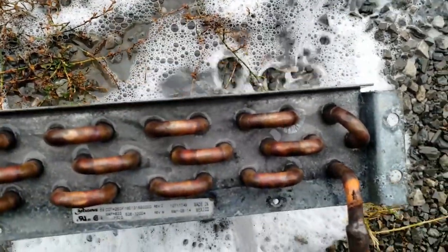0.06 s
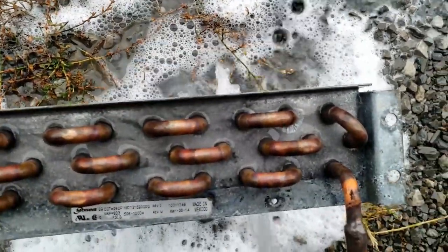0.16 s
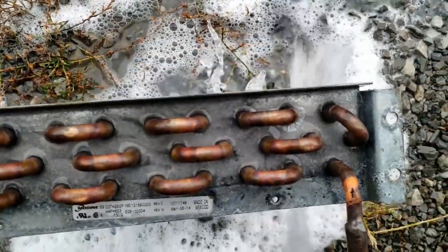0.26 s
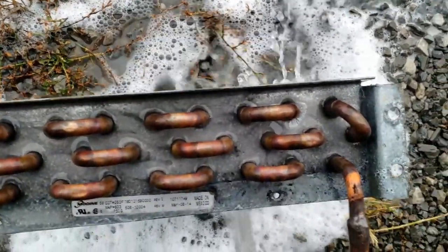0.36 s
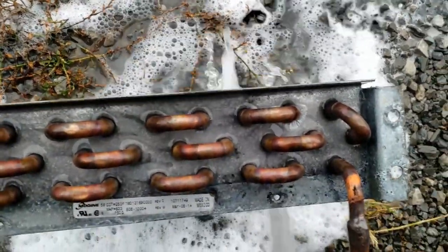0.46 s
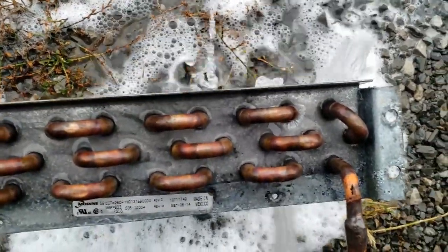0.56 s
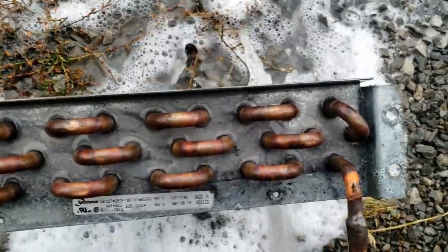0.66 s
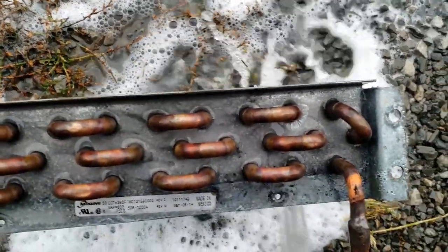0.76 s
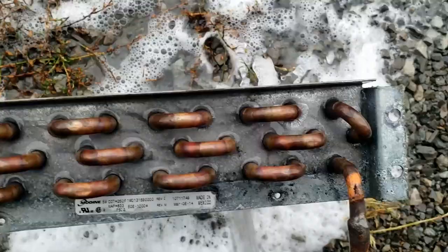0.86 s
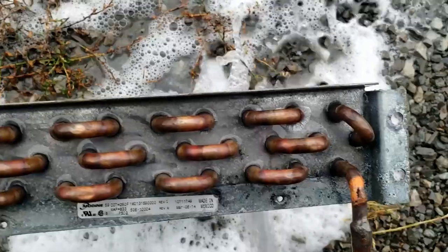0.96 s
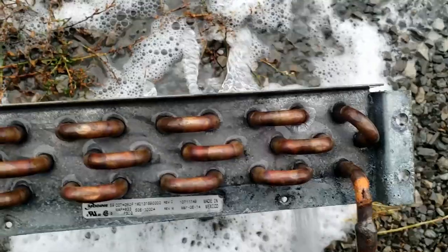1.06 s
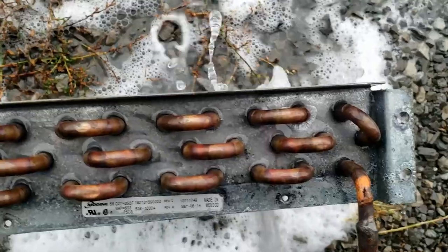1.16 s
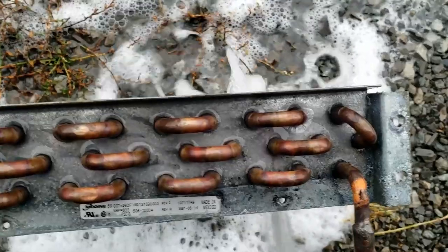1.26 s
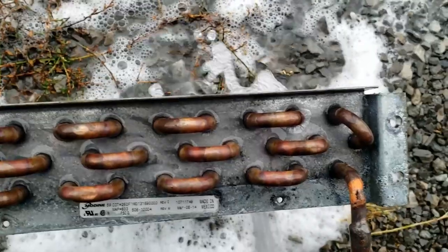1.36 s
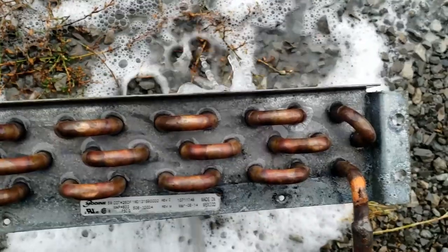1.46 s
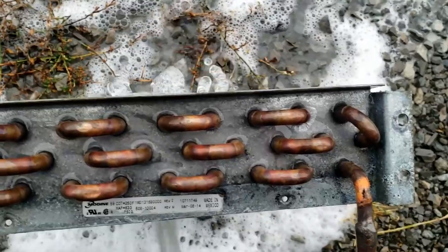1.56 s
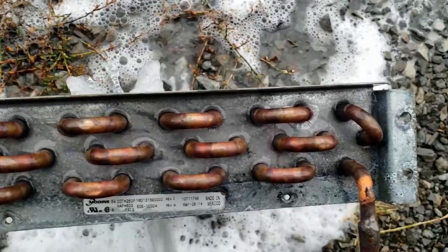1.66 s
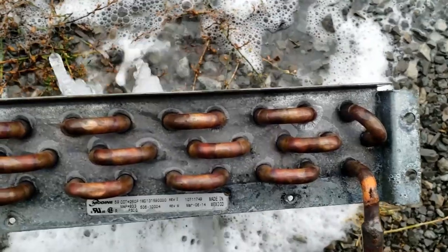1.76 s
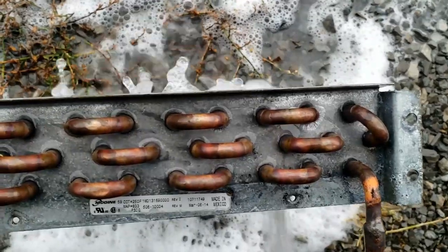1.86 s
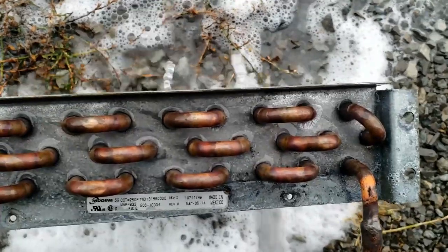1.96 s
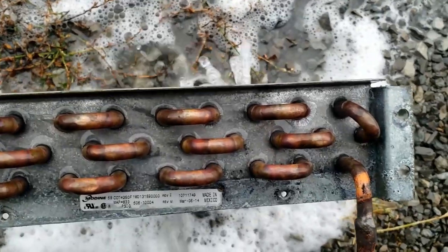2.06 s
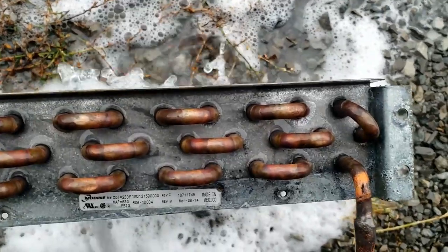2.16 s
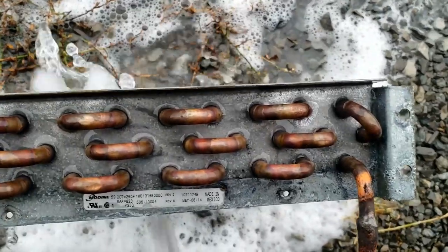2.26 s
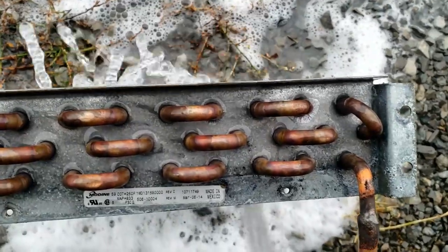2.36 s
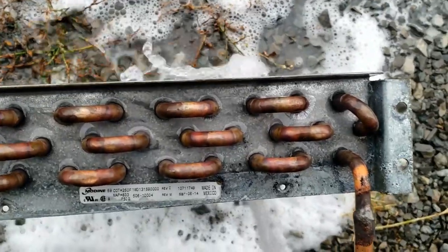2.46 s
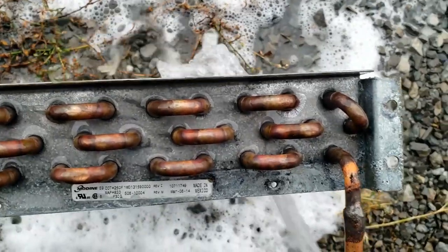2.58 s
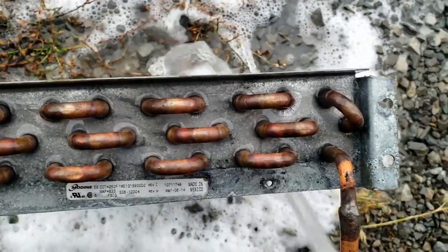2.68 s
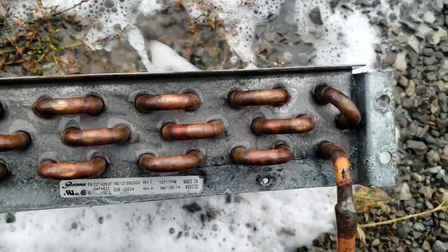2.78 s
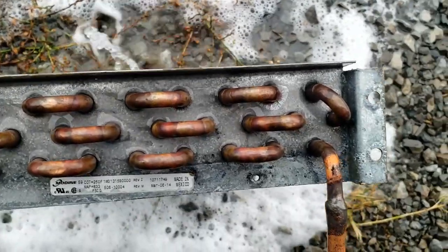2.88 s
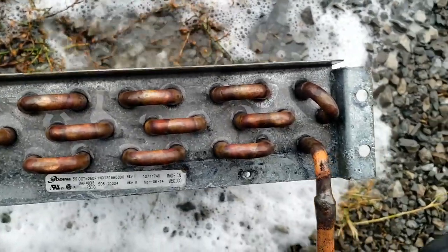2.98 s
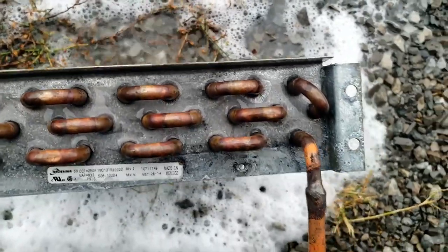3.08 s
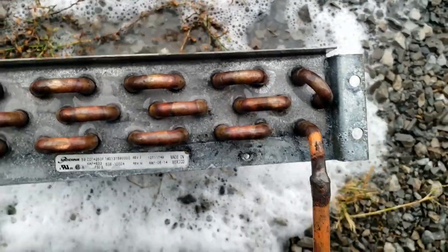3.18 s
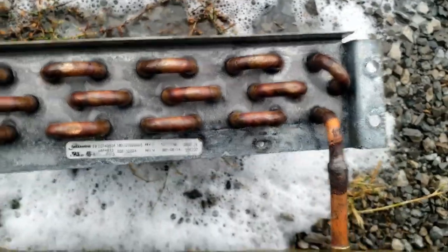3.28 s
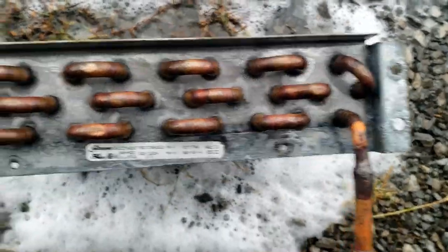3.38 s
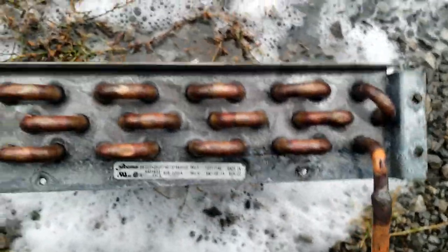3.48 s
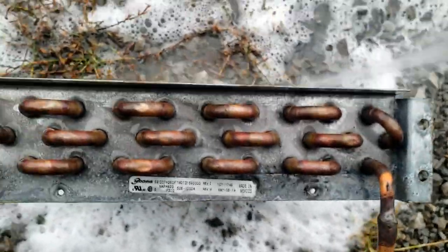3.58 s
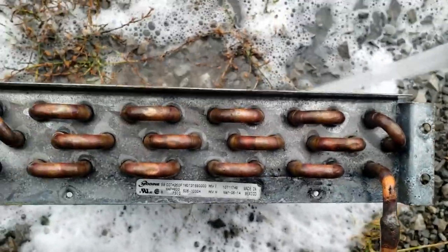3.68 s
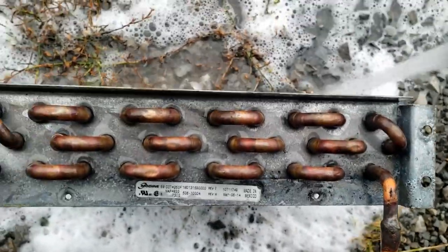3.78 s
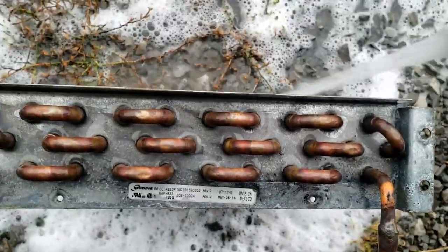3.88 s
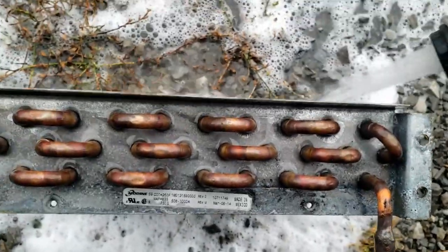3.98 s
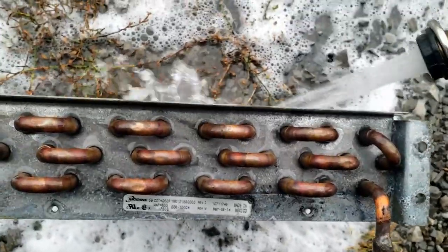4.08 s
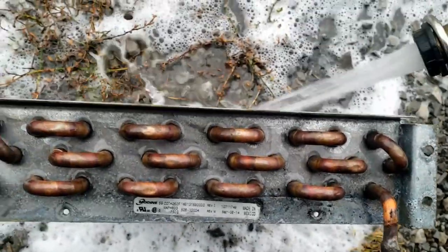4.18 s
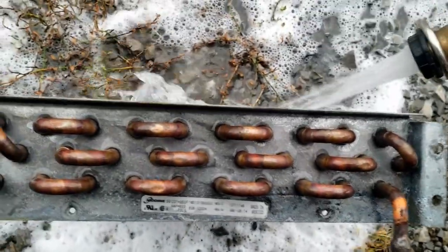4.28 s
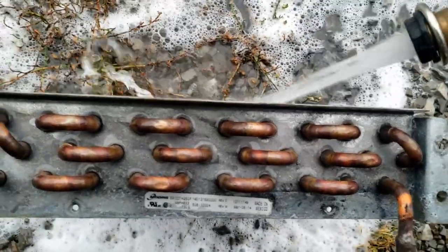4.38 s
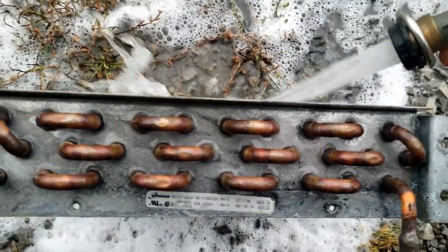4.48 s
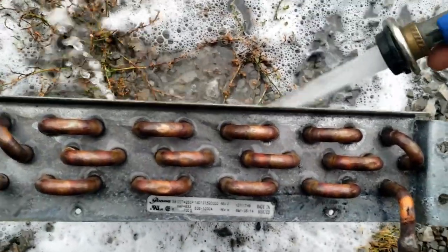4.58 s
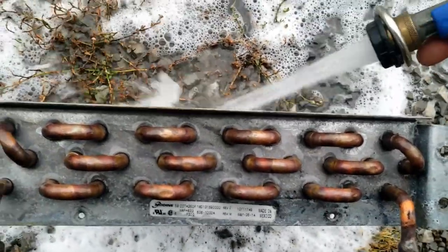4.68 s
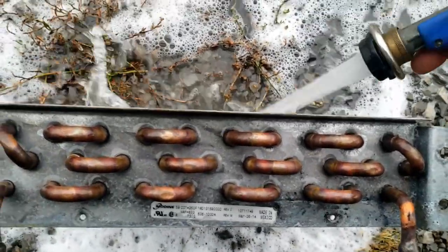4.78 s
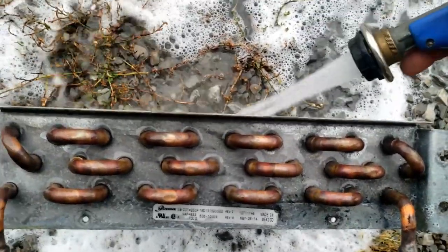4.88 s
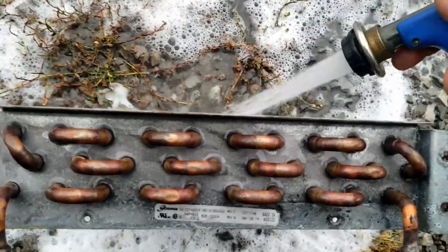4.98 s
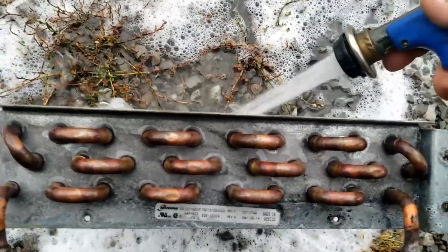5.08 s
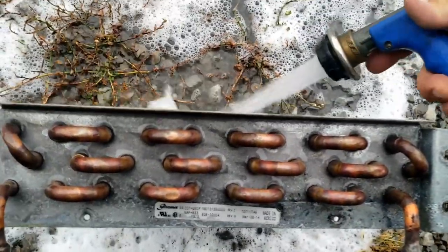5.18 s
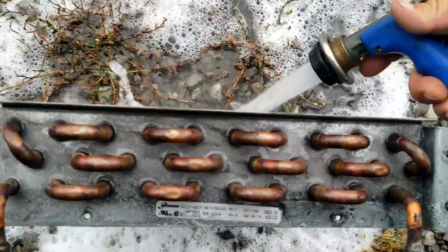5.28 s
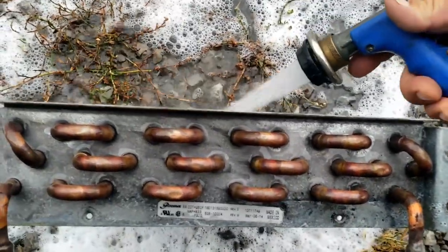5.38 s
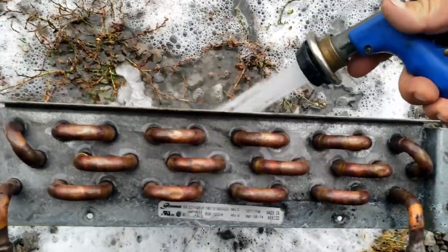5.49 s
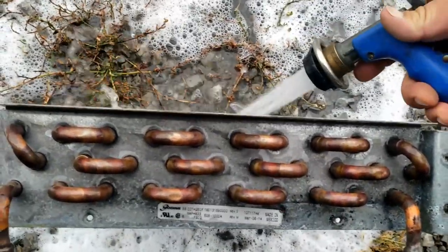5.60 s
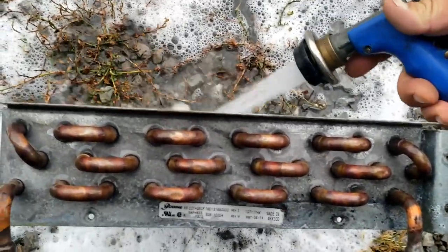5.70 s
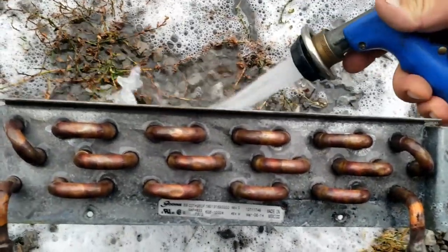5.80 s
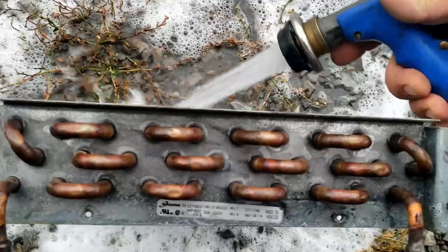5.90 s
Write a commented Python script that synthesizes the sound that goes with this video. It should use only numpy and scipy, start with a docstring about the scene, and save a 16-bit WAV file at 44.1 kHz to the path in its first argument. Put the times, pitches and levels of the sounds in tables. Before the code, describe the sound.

A garden hose jet hisses loudly on a finned metal coil, cuts off with a few watery splats, then bursts back and sprays on.

```python
"""Outdoors, close by and a little to the left of a two-port microphone, a garden hose sprays a finned metal coil.
Countless drops, each a tiny noise burst, hiss on the fins and make the gaps between them ring.
A short reflection inside the coil adds a row of peaks that phases as the jet sweeps.
The jet breaks off, a few slugs of water splat down, a soft spray creeps back, and the jet strikes again.
Stray drops tick near the microphone, soft bumps thud, and low outdoor rumble and a faint hum lie behind."""
import sys
import numpy as np
from scipy import signal
from scipy.fft import rfft, irfft
from scipy.io import wavfile
from scipy.ndimage import uniform_filter1d

SR = 44100
rng = np.random.default_rng(int(sys.argv[2]) if len(sys.argv) > 2 else 0)


def generate_wav(signal):
    """Clip the signal to [-1, 1] and save it as 16-bit WAV at the path in sys.argv[1]."""
    frames = np.transpose(np.atleast_2d(signal))
    scaled = np.clip(frames, -1, 1) * 32767
    pcm = np.round(scaled).astype(np.int16)
    wavfile.write(sys.argv[1], SR, pcm)


N = 261954
TIME = np.arange(N) / SR
HZ, FRAME_S, _ = signal.stft(TIME, SR, nperseg=512, noverlap=384)  # grid for all spectral shaping

# Colour of the first jet's water noise: pitch_hz, level_db (per Hz, relative)
FIRST_JET_COLOUR = [(120, -41), (200, -32), (538, -30), (709, -23), (1450, -15.5), (2130, -6), (3430, -9),
                    (4040, -2.5), (4950, -3), (6050, 0.5), (7410, -2.5), (9060, -21), (10300, -20.5),
                    (12800, -1.5), (16000, -16)]
# Resonances and hollows of the fin gaps under the first jet: pitch_hz, width_hz, lift_db
FIRST_JET_GAPS = [(714, 170, 5), (1700, 140, 0.5), (2173, 350, 4.5), (2530, 160, 1), (4180, 120, 1),
                  (4300, 140, -2), (4600, 130, 3.5), (6100, 400, 0.5), (13100, 1240, -4)]
# Lag of the reflection inside the coil, set by where the jet is aimed: time_s, lag_ms
FIRST_JET_ECHO = [(0, 1.35), (1.5, 1.43), (2.8, 1.22)]
# Force of the first jet on the coil, drifting as the hand moves: time_s, splash_db (before passes and surge)
FIRST_JET_FORCE = [(0, -30.5), (.12, -27), (.95, -25.5), (1.35, -27), (1.9, -28.5), (2.3, -28.5),
                   (2.68, -29.5)]
# Passes of the first jet squarely into the fins: middle_s, length_s, strength_0_to_1
SQUARE_PASSES = [(1.676, 0.42, 0.7), (2.21, .3, 1.0)]
# On a pass the fins hiss at RING_HZ in place of GAP_HZ; the gap rings most while the jet rests on it
RING_HZ, RING_WIDTH_HZ = 6210, 2700
GAP_HZ, GAP_WIDTH_HZ, GAP_AT_S, GAP_S = 4150, 1200, 0.98, 0.54
# The closing nozzle narrows the jet into a last surge, then cuts it off
SURGE_AT_S, SURGE_S, SHUT_AT_S, SHUT_S, MIST_LINGER_S = 2.758, 0.053, 2.7865, 0.019, .008


def first_jet(body_db=-7.5, mist_db=-1.34, gap_db=3, gap_swell_db=3, ring_db=10, hollow_db=5,
              pass_db=4.0, pass_body_db=-6.0, pass_mist_db=-1.5, closing_db=7.0, closing_body_db=3,
              closing_ring_db=6, closing_hz=3300, lean_db=0.7, lean_db_per_s=0.9):
    """A steady jet that rings the fins on each pass, surges as the nozzle closes, and stops."""
    square = sum(strength * hump(s, length) for s, length, strength in SQUARE_PASSES)
    closing = hump(SURGE_AT_S, SURGE_S)
    valve_db = in_db(1 - step(SHUT_AT_S, SHUT_S))
    late_mist_db = in_db(1 - step(SHUT_AT_S + MIST_LINGER_S, SHUT_S)) - valve_db

    splash_db = follow(FIRST_JET_FORCE, FRAME_S)[0] + pass_db * square + closing_db * closing + valve_db
    body_db = body_db + pass_body_db * square + closing_body_db * closing
    mist_db = mist_db + pass_mist_db * square + late_mist_db

    gap_lift_db = gap_db * (1 - square) + gap_swell_db * hump(GAP_AT_S, GAP_S)
    pass_tone_db = ring_db * bell(RING_HZ, RING_WIDTH_HZ) + hollow_db * bell(600, 590)
    aim_db = gap_lift_db * bell(GAP_HZ, GAP_WIDTH_HZ) + square * pass_tone_db
    aim_db = aim_db + closing_ring_db * closing * bell(closing_hz, 1900)

    ripple = comb(follow(FIRST_JET_ECHO, FRAME_S)[0], strength=0.086)
    return spray((splash_db, body_db, mist_db), FIRST_JET_COLOUR, FIRST_JET_GAPS, aim_db, ripple,
                 lean_db=lean_db + lean_db_per_s * (FRAME_S - 1.5),
                 surge_db=0.62, flutter_db=0.83, spread_db=1.5)


# Colour of the second jet's water noise: pitch_hz, level_db (per Hz, relative)
SECOND_JET_COLOUR = [(120, -44), (200, -27), (548, -31), (899, -22.5), (2090, -9.5), (2470, -12),
                     (3020, -12.5), (3830, -8), (4270, -5), (5040, -4), (7270, -1.5), (9580, -14.5),
                     (11900, 0.5), (13300, 5), (16000, -5)]
# Resonances of the fin gaps under the second jet: pitch_hz, width_hz, lift_db
SECOND_JET_GAPS = [(300, 370, 2), (1860, 130, 3), (2130, 310, 2.5), (2500, 250, 0), (2730, 140, 5),
                   (4100, 250, 2)]
# Lag of its reflection inside the coil, before the waggle: time_s, lag_ms
SECOND_JET_ECHO = [(3.6, 1.39), (3.85, 1.34), (4.05, 1.39), (4.35, 1.365), (4.85, 1.37), (5.15, 1.18),
                   (5.65, 1.185), (5.94, 1.27)]
SECOND_ECHO_SHARE, SECOND_ECHO_GROWTH_PER_S = .34, .07
# Force of the second jet on the coil: time_s, splash_db (before the opening burst)
SECOND_JET_FORCE = [(3.6, -31), (4.15, -32.5), (4.4, -30.5), (5.05, -32), (5.94, -31.5)]
# On reopening the mist arrives first, and the pressure stored in the hose dies away
OPEN_AT_S, OPEN_S, MIST_LEAD_S, SETTLE_S = 3.597, 0.016, 0.019, 0.18
# The hand then waggles the jet to and fro, slowing down
WAGGLE_CREST_S, WAGGLE_PER_S, WAGGLE_SLOWING_PER_S2 = 4.025, 4.65, .75
WAGGLE_FROM_S, WAGGLE_MS, WAGGLE_BEND_HZ = 4.1, .06, 130


def second_jet(body_db=-10, mist_db=2.6, mist_db_per_s=-0.8, burst_db=10.5, burst_body_db=-4,
               gap_db=4.5, gap_from_s=3.96, gap_hz=4360, gap_width_hz=550, waggle_gap_db=1.5,
               burst_ring_db=6, burst_ring_hz=3700, burst_glide_hz=3800, burst_glide_s=0.05,
               skim_db=-7, skim_hz=3800, skim_s=0.017):
    """The jet bursts out with a falling ring, settles, and phases as the hand waggles it across the fins."""
    age = np.maximum(FRAME_S - OPEN_AT_S, 0)
    burst = np.exp(-age / SETTLE_S)
    valve_db = in_db(step(OPEN_AT_S, OPEN_S))
    early_mist_db = in_db(step(OPEN_AT_S - MIST_LEAD_S, OPEN_S)) - valve_db

    splash_db = follow(SECOND_JET_FORCE, FRAME_S)[0] + burst_db * burst + valve_db
    body_db = body_db + burst_body_db * burst
    mist_db = mist_db + mist_db_per_s * (age - 1) + early_mist_db

    t = FRAME_S - WAGGLE_CREST_S
    waggle_turns = WAGGLE_PER_S * t - WAGGLE_SLOWING_PER_S2 * t ** 2 / 2
    waggle = step(WAGGLE_FROM_S, 0.086) * np.cos(2 * np.pi * waggle_turns)
    lag_ms = follow(SECOND_JET_ECHO, FRAME_S)[0] + WAGGLE_MS * waggle

    # the struck gap bends with the waggle, and rings hardest when a peak of the reflection sweeps through it
    in_tune = np.cos(2 * np.pi * gap_hz * lag_ms / 1000)
    gap_lift_db = (gap_db + waggle_gap_db * in_tune) * step(gap_from_s, 0.073)
    falling_hz = burst_ring_hz + burst_glide_hz * np.exp(-age / burst_glide_s)
    aim_db = gap_lift_db * bell(gap_hz - WAGGLE_BEND_HZ * waggle, gap_width_hz)
    aim_db = aim_db + burst_ring_db * burst * bell(falling_hz, 1700)
    # at first the jet only skims the fins
    aim_db = aim_db + skim_db * np.exp(-age / skim_s) * bell(skim_hz, 2200)

    ripple = comb(lag_ms, strength=SECOND_ECHO_SHARE + SECOND_ECHO_GROWTH_PER_S * age)
    return spray((splash_db, body_db, mist_db), SECOND_JET_COLOUR, SECOND_JET_GAPS, aim_db, ripple,
                 lean_db=0.5, surge_db=0.47, flutter_db=0.48, spread_db=1.5)


# Colour of the weak flows: pitch_hz, level_db (per Hz, relative)
WEAK_COLOUR = [(180, -69), (300, -27), (678, -22.5), (842, -14), (1010, -12.5), (1530, -8), (2000, -9.5),
               (2400, -8.5), (2740, -11.5), (3290, -12.5), (3580, -15), (6410, -13.5), (10200, -21),
               (13100, -11.5), (16000, -14)]
# Resonances and hollows of the fin gaps under them: pitch_hz, width_hz, lift_db
WEAK_GAPS = [(850, 300, 2.5), (2360, 230, 5.5), (2820, 300, 2.5), (3300, 250, 3), (4370, 700, -3),
             (6400, 650, 2.5)]
# Draining, trickle and soft spray in the pause:
# start_s, stop_s, splash_db, growth_db_per_s, body_db (re splash), mist_db (re splash)
PAUSE_FLOWS = [(2.795, 3.02, -54, -5, -8, 0), (3.0, 3.217, -64.5, -16, -2, 4.5),
               (3.2, 3.325, -66.5, 120, 0, 5), (3.322, 3.55, -46.5, -25, -2.5, 1)]
WEAK_EDGE_S = 0.0045


def weak_flows():
    """Between the jets a little water still runs over the fins."""
    power = np.zeros((3, len(FRAME_S)))
    for start, stop, db, growth, body_db, mist_db in PAUSE_FLOWS:
        gate = step(start, WEAK_EDGE_S) * (1 - step(stop, WEAK_EDGE_S))
        level = gate * gain_of(db + growth * np.clip(FRAME_S - start, 0, stop - start))
        power += (level * gain_of([[0], [body_db], [mist_db]])) ** 2
    splash, body, mist = in_db(np.sqrt(power))
    return spray((splash, body - splash, mist - splash), WEAK_COLOUR, WEAK_GAPS,
                 lean_db=.5, surge_db=0.4, flutter_db=1.3, spread_db=4.0)


def spray(flow, colour, gaps, aim_db=0, ripple=1, lean_db=0, surge_db=1, flutter_db=1, spread_db=3,
          gurgle_db=1.34, patchy_db=1.46):
    """Drops drive the fin body, the splash and the mist, all surging with the broken jet."""
    splash_db, body_db, mist_db = flow  # body and mist are relative to the splash
    shape_db = read(colour) + sum(lift * bell(hz, width) for hz, width, lift in gaps) + aim_db
    # water films open and close: blotches of colour, deepest in the low gurgle
    film_db = (patchy_db + gurgle_db * bell(420, 1400)) * patches(count_bins=4, count_frames=18)
    shape = gain_of(shape_db + film_db)

    # split into body below 3350 Hz, splash up to 9300 Hz and mist above; each is levelled in its own band
    below_3350, below_9300 = (1 / (1 + (HZ[:, None] / hz) ** 12) for hz in (3350, 9300))
    above_body, above_splash = (1 / (1 + (hz / (HZ[:, None] + 1)) ** 12) for hz in (3350, 9300))
    body = (1 - above_body) * gain_of(body_db) / band_level(shape, 600, 3200)
    splash = (above_body - above_splash) / band_level(shape, 3500, 8000)
    mist = above_splash * gain_of(mist_db) / band_level(shape, 11000, 16000)

    # clusters of drops flicker across wide bands
    level = gain_of(splash_db + flutter_db * patches(count_bins=45, count_frames=3))
    drops = patter(per_s=3400, spread_db=spread_db, splash_s=0.0006, wash=1.0)
    drops = evened(drops * gain_of(surge_db * wander(7, 110, 0.49)))
    return at_ports(drops, ripple * shape * level * (body + splash + mist), lean_db)


def comb(left_lag_ms, strength, right_lag_ms=0.11, centre_hz=4000, span_hz=7000):
    """Sound bouncing inside the coil: a row of peaks that sweeps as the lag changes, fading from centre_hz."""
    lag_ms = left_lag_ms + np.array([0, right_lag_ms])[:, None, None]  # right port hears a longer lag
    share = np.clip(strength, 0, .8) * bell(centre_hz, span_hz)
    phase = 2 * np.pi * HZ[:, None] * lag_ms / 1000
    return np.sqrt((1 - share ** 2) / (1 + share ** 2 - 2 * share * np.cos(phase)))


def patter(per_s, spread_db, splash_s, wash):
    """Each drop is a tiny burst of noise; most are small and melt into a wash."""
    lands = rng.random(N) < per_s / SR
    size = gain_of(spread_db * np.minimum(rng.exponential(1, N), 5)) * lands
    power = signal.lfilter([1], [1, -np.exp(-1 / (splash_s * SR))], size ** 2)
    return evened(np.sqrt(power / power.mean() + wash) * rng.standard_normal((2, N)))


# Colour of the slaps: pitch_hz, level_db (per Hz, relative)
SLAP_COLOUR = [(240, -59), (400, -23), (460, -51), (520, -40), (789, -53), (1760, -18.5), (3310, -19),
               (5690, 0.5), (10100, -13.5), (12900, -12), (16000, -10)]
# Large slugs of water landing: start_s, level_db (before level_db below), decay_s, brightness_db_per_octave
SLUGS = [(2.874, -36.5, 0.0036, 10), (2.894, -36, 0.0074, 3), (2.958, -30.5, .008, 1),
         (2.97, -27, .0027, 0), (2.9745, -25, .0028, 1), (3.213, -43, 0.0099, -7.5)]
# Smaller slugs dribble down among them
DRIBBLE_FROM_S, DRIBBLE_TO_S, DRIBBLE_DECAY_S = 2.9, 3.01, 0.0076
DRIBBLE_DB, DRIBBLE_SPREAD_DB = -37.5, 2.5


def splats(level_db=1.0, lean_db=5.0, rise_s=.0004, count=8):
    """Slugs of water slap down, each a short crackling burst."""
    dribble = []
    for slot in (np.arange(count) + rng.random(count)) / count:
        at_s = DRIBBLE_FROM_S + slot * (DRIBBLE_TO_S - DRIBBLE_FROM_S)
        dribble.append((at_s, DRIBBLE_DB + DRIBBLE_SPREAD_DB * rng.standard_normal(), DRIBBLE_DECAY_S))

    power, age = np.zeros(N), TIME[:SR // 10]
    for s, db, decay, *_ in list(SLUGS) + dribble:
        slap = gain_of(db) * (1 - np.exp(-age / rise_s)) * np.exp(-age / decay)
        power[round(s * SR):][:len(age)] += slap ** 2

    # brightness glides from slug to slug
    tilt_db = follow(SLUGS, FRAME_S)[2] * np.log2((HZ[:, None] + 500) / 6000)
    shape = evened(gain_of(read(SLAP_COLOUR))) * gain_of(tilt_db)
    crackle = patter(per_s=1700, spread_db=4.5, splash_s=0.0002, wash=0.82)
    return at_ports(np.sqrt(power) * crackle, gain_of(level_db) * shape, lean_db)


# Stray drops ticking close by: start_s, level_db (before level_db below), pitch_hz
STRAY_DROPS = [(1.951, -17, 11900), (3.682, -20, 12500)]


def ticks(level_db=-4, width_hz=3500, decay_s=0.0017):
    """Single drops strike near the microphone, each a dying burst of noise around its pitch."""
    burst = 0
    for s, db, _ in STRAY_DROPS:
        burst = burst + gain_of(db) * (TIME > s) * np.exp(-np.minimum(abs(TIME - s) / decay_s, 20))
    colour = evened(bell(follow(STRAY_DROPS, FRAME_S)[1], width_hz))
    return at_ports(burst * rng.standard_normal((2, N)), gain_of(level_db) * colour, 0)


# Soft handling bumps at the microphone: start_s, level_db (before level_db below)
HANDLING_BUMPS = [(.31, -60), (.59, -51), (.685, -54), (3.03, -53)]


def bumps(hz=62, swell_s=0.0074, level_db=2):
    """Each bump is a few dying cycles of bass."""
    out, age = np.zeros(N), TIME[:SR // 5]
    thud = age / swell_s * np.exp(1 - age / swell_s) * np.sin(2 * np.pi * hz * age)
    for s, db in HANDLING_BUMPS:
        out[round(s * SR):][:len(age)] += gain_of(db + level_db) * thud
    return out


# Colour of the outdoor rumble: pitch_hz, level_db (per Hz, relative)
RUMBLE_COLOUR = [(12, -41), (20, -14), (70, 0.5), (113, -1), (146, -7), (250, -3.5), (320, -29),
                 (550, -120)]


def rumble(level_db=-68.5, apart=0.5, swell_db=0.5, corner_hz=260):
    """Low outdoor noise, partly shared by the ports, slowly swelling."""
    f, (hz, db) = np.fft.rfftfreq(N, 1 / SR), np.transpose(RUMBLE_COLOUR)
    colour_db = np.interp(np.log(f + 1), np.log(hz + 1), db)
    shape = gain_of(colour_db) / (1 + (f / corner_hz) ** 4)
    mid, side = evened(irfft(rfft(rng.standard_normal((2, N))) * shape, N))
    swell = gain_of(level_db + swell_db * wander(1, 8, .3))
    return np.array([mid + apart * side, mid - apart * side]) * swell


# Faint hum: mean pitch_hz, level_db (rms, before trim_db below)
FAINT_HUM = [(118.4, -77.5)]


def hum(trim_db=-1.0, waver_hz=3.3):
    """A faint sine tone whose pitch wavers."""
    hz, db = FAINT_HUM[0]
    turns = np.cumsum(hz + waver_hz * wander(0.91, 8, .3)) / SR
    return np.sqrt(2) * gain_of(db + trim_db) * np.sin(2 * np.pi * turns)


# Level between the two microphone ports: pitch_hz, left_minus_right_db (before each source's own lean)
PORT_LEAN = [(60, 1.0), (92, 1.5), (140, 2.0), (210, 2.0), (330, 3.0), (500, 4.6), (770, 2.3), (1170, 6.7),
             (1790, 8.4), (2740, 4.8), (4190, 10.3), (6410, 23.8), (9810, 3.8), (15000, 8.1)]
# Likeness of the two ports: pitch_hz, likeness_0_to_1
PORT_LIKENESS = [(60, 0.52), (130, 0.51), (290, 0.51), (640, 0.65), (1410, 0.6), (3100, 0.49), (6820, 0.24),
                 (15000, 0.05)]
# Phase between the ports: pitch_hz, left_leads_rad
PORT_LEAD = [(60, 0), (900, 0.55), (2000, 0.8), (3500, 1.14), (5200, 1.2), (7000, 2), (8500, -2.5),
             (10500, 2), (12000, -0.5), (14000, 0)]


def at_ports(pair, gain, lean_db):
    """Colours two white signals and places them: more alike in the bass, shaded on the right in the treble."""
    a, b = signal.stft(pair, SR, nperseg=512, noverlap=384)[2]
    same, lead = np.clip(read(PORT_LIKENESS), 0, 1), read(PORT_LEAD)
    shade = gain_of(-read(PORT_LEAN) - lean_db)
    right = shade * (same * np.exp(-1j * lead) * a + np.sqrt(1 - same ** 2) * b)
    # keep the average of both ports at the asked level
    centre = np.sqrt(1 + shade ** 2 + 2 * shade * same * np.cos(lead)) / 2
    return signal.istft(np.array([a, right]) * gain / centre, SR, nperseg=512, noverlap=384)[1][:, :N]


def gain_of(db):
    """Decibels to amplitude."""
    return np.exp(np.asarray(db) * (np.log(10) / 20))


def in_db(gain):
    """Amplitude to decibels."""
    return 20 * np.log10(gain + 1e-9)


def evened(x):
    """Scales to rms 1."""
    return x / np.sqrt(np.mean(x ** 2) + 1e-20)


def read(points):
    """A spectrum table as a column over the frequency bins."""
    f, value = np.transpose(points)
    return np.interp(np.log(HZ + 1), np.log(f + 1), value)[:, None]


def follow(rows, t):
    """Every column of a curve at the times t."""
    s, *columns = np.transpose(rows)
    return [np.interp(t, s, c) for c in columns]


def bell(hz, width):
    """A resonance hump over frequency, of height 1 and the given full width at half height."""
    return np.exp(-np.log(16) * ((HZ[:, None] - hz) / width) ** 2)


def hump(at_s, length_s):
    """A smooth swell in time, of height 1 and the given full length at half height."""
    return np.exp(-np.log(16) * ((FRAME_S - at_s) / length_s) ** 2)


def step(at_s, edge_s):
    """A smooth rise from 0 to 1, as of a valve opening."""
    return .5 + .5 * np.tanh((FRAME_S - at_s) / (2 * edge_s))


def wander(low_hz, high_hz, slope):
    """Random motion of rms 1, mostly between two rates."""
    f = np.fft.rfftfreq(N, 1 / SR)
    above_low = (f / low_hz) ** 2 / (1 + (f / low_hz) ** 2)
    shape = above_low / (1 + (f / high_hz) ** 2) / (f + 1) ** slope
    return evened(irfft(rfft(rng.standard_normal(N)) * shape, N))


def patches(count_bins, count_frames):
    """A random field of rms 1 over frequency and time, in blotches of the given size."""
    field = rng.standard_normal((len(HZ), len(FRAME_S)))
    return evened(uniform_filter1d(uniform_filter1d(field, count_bins, 0), count_frames, 1))


def band_level(gain, low, high):
    """The relative rms that white noise has in one band after this gain."""
    return np.sqrt((gain[(HZ > low) & (HZ < high)] ** 2).sum(0) / len(HZ))


def scene():
    """Jet, pause, jet, over the outdoor background."""
    water = first_jet() + second_jet() + weak_flows() + splats() + ticks()
    return water + bumps() + rumble() + hum()


def record(dry):
    """The recorder's band limit: a steep low-pass at 15850 Hz."""
    lowpass = signal.firwin(511, 15850, window=("kaiser", 9), fs=SR)
    return signal.oaconvolve(dry, lowpass[None], "same")


dry = scene()
out = record(dry)
generate_wav(out)
```